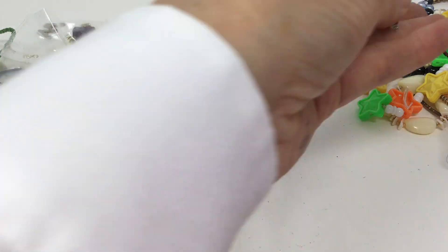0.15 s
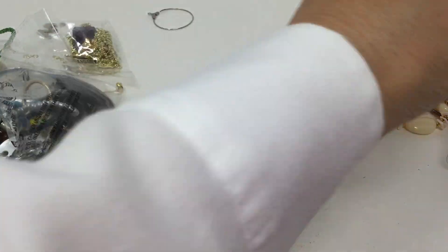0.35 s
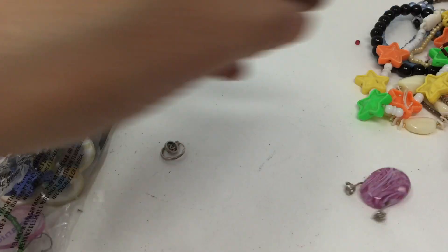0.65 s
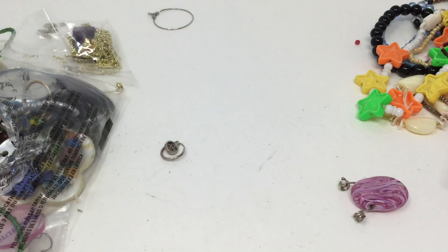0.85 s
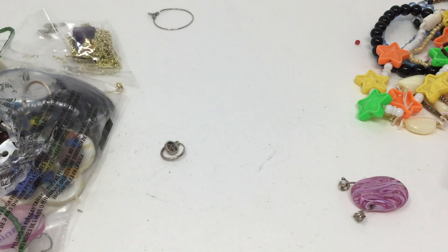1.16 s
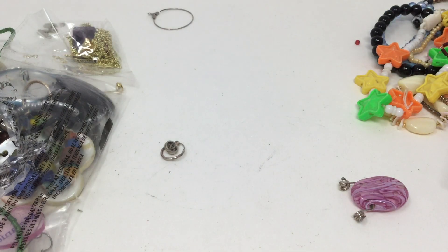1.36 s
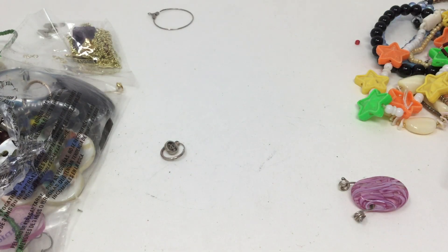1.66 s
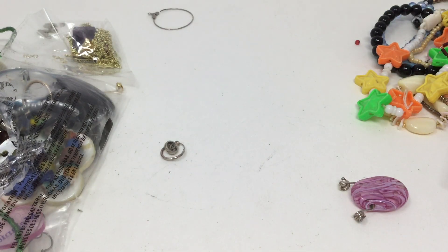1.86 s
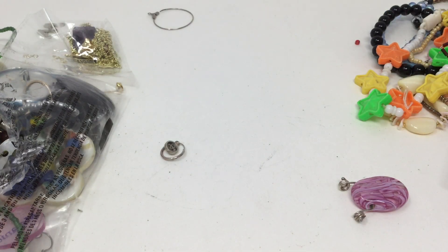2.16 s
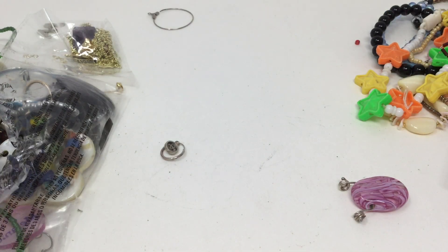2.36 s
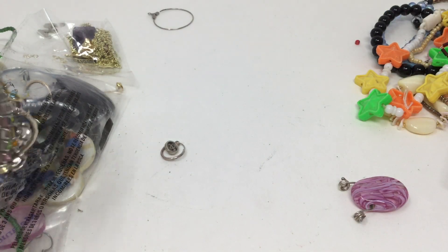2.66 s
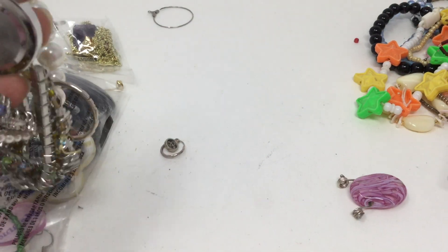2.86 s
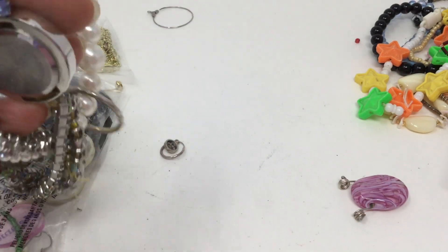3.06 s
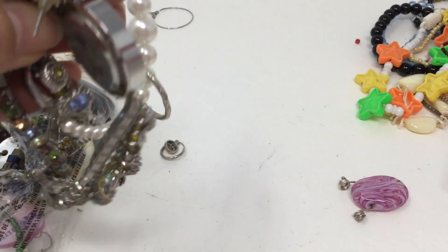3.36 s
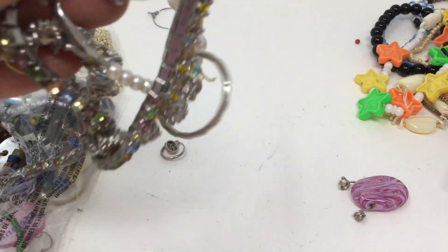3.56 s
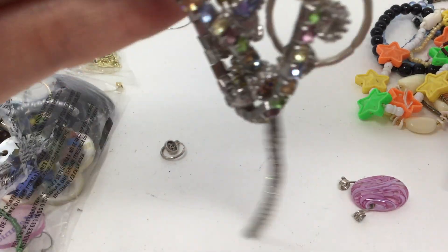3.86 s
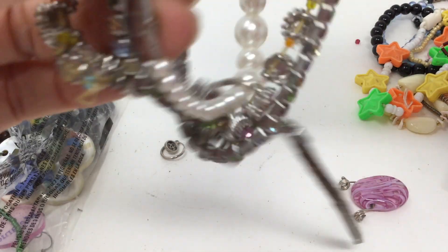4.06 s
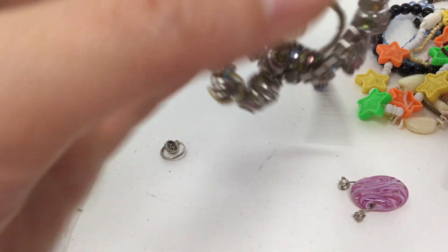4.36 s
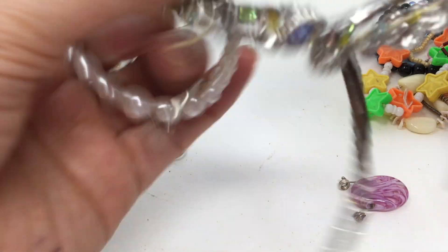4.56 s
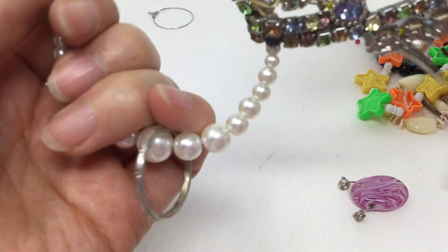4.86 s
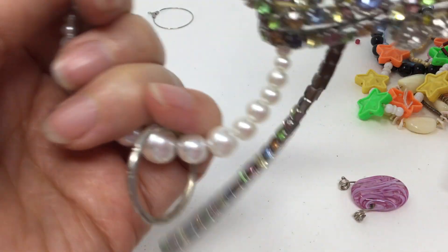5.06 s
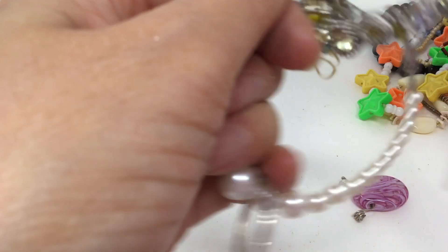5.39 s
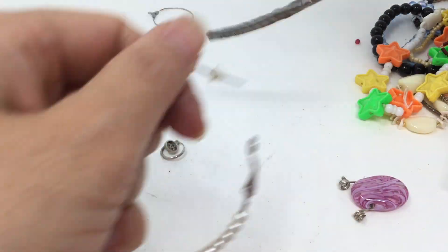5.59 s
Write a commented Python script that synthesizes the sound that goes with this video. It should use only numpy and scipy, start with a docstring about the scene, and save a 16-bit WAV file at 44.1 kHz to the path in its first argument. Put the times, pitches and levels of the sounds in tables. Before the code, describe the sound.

A hard piece of jewellery clatters loudly onto a tabletop, then chains and beads rustle, clack and jingle lightly over a low unsteady hum.

```python
"""At a tabletop in a small room with a low, unsteady hum, costume jewellery is sorted, heard by one microphone.
A hard piece clatters down and rings through resonances; dull bumps stir the low modes of the tabletop.
A hand rummages in a heap of chains and beads, then a tangle is lifted and pulled apart, jingling:
showers of damped sines make jingle and scrape, while clacks, snaps and knocks are struck one by one.
The room answers with a tail of noise in which each frequency dies at its own speed."""
import sys
import numpy as np
from scipy import signal
from scipy.fft import rfft, irfft, next_fast_len
from scipy.io import wavfile
from scipy.ndimage import uniform_filter1d, map_coordinates

SR = 44100
rng = np.random.default_rng(int(sys.argv[2]) if len(sys.argv) > 2 else 0)


def persist_wave(psi):
    """Save psi, clipped to +-1, as 16-bit WAV."""
    counts = np.round(np.clip(psi, -1, 1) * 32767).astype(np.int16)
    wavfile.write(sys.argv[1], SR, np.atleast_2d(counts).T)


N = 252648

# Levels in the tables are relative: each source sets its own gain later.
# tones of the hum before its swell: [f/Hz, level/dB rms]
HUM_TONES = [(96.9, -76), (129.2, -76), (150.7, -72)]
# slow swell of the hum: [t/s, gain/dB]
HUM_SWELL = [(4.2, 5), (5, -3.5)]
# spectrum of the quiet air: [f/Hz, level/dB]
AIR_SPECTRUM = [(25, -27.5), (110, -15.5), (200, -19.5), (550, -36.5), (5000, -46.5), (15000, -55)]
# decay of the room: [f/Hz, time to fall 60 dB/s]
ROOM_DECAY = [(100, 0.89), (500, 0.6), (1400, 1), (4200, 0.4)]
# what the walls reflect: [f/Hz, level/dB]
WALL_REFLECTION = [(100, -6.5), (2100, -1.5), (3200, -1), (12000, -7.5)]
# treble response of the microphone: [f/Hz, gain/dB]
MIC_RESPONSE = [(12500, -1.5), (14000, -12), (15400, -24.5)]
# low modes of the tabletop: [f/Hz, width/Hz, level/dB]
TABLE_MODES = [(69.5, 36, -12), (135.7, 38.8, 1.5), (168, 44.6, -1.5), (308, 33, -11.5)]
# dull bumps on the table: [t/s, knock level/dB, thump level/dB]
BUMPS = [(0.612, -50, -33.5), (0.689, -15, -37), (2.796, -58, -36), (2.811, -58.5, -37),
         (2.856, -46.5, -45.5), (2.907, -29, -38), (2.9156, -17, -32), (2.923, -25.5, -26),
         (2.964, -28, -34.5), (3.0, -34, -49), (3.598, -59, -63), (3.633, -54, -58.5), (4.003, -37, -60),
         (5.267, -52.5, -60.5)]
# spectrum of a padded knock: [f/Hz, level/dB]
KNOCK_SPECTRUM = [(50, -25), (200, -8.5), (440, 3), (600, -2), (900, 2), (1600, -2.5), (2400, -15),
                  (3500, -32.5), (12000, -66)]
# spectrum of the boom under a bump: [f/Hz, level/dB]
BOOM_SPECTRUM = [(350, 0.0), (2000, -20.5)]
# the hard piece lands and rocks: [t/s, level/dB]
CLATTER = [(.58, -20.5), (.586, -16), (.598, -11.5), (.607, -11.5), (.614, -27), (.667, -20), (.68, -19.5),
           (.729, -28.5), (.87, -33.5), (.89, -30)]
# resonances of the hard piece: [f/Hz, width/Hz, level/dB]
PIECE_MODES = [(624, 90, -4), (808, 90, 1.5), (1218, 60, 6), (1323, 150, 1), (1630, 74, -11.5),
               (2026, 37, 4), (2250, 140, -8.5), (2553, 80, -5), (4070, 190, -21)]
# spectrum applied to its ringing: [f/Hz, level/dB]
RING_SPECTRUM = [(4200, 3.0), (9000, -9.5)]
# spectrum of its loose parts rattling: [f/Hz, level/dB]
RATTLE_SPECTRUM = [(40, -36.5), (250, -5.0), (2300, -2.5), (3200, -9.5), (5500, -18.0), (13000, -36.5)]
# the heap knocks against its container: [t/s, level/dB]
TAPS = [(1.243, -41), (1.605, -40), (1.665, -34.5), (1.899, -35), (2.025, -39)]
# resonances of the container: [f/Hz, width/Hz, level/dB]
CONTAINER_MODES = [(805, 52, 2), (1290, 120, -15), (2210, 260, -14.5)]
# a free ring sings briefly: [t/s, level/dB, f/Hz]
RINGS = [(2.117, -48, 6170), (3.703, -64.5, 6920)]
# beads and pendants clack together: [t/s, level/dB, f/Hz]
BEADS = [(0.069, -57, 1470), (0.775, -36.5, 4180), (1.095, -40.5, 2370), (1.485, -29.5, 3860),
         (1.517, -27.5, 2460), (1.572, -35, 2350), (1.61, -39, 2350), (1.951, -36, 2450),
         (1.971, -30, 4250), (2.01, -27, 4080), (2.023, -26.5, 4230), (2.046, -29.5, 3260),
         (2.341, -40, 1368), (2.963, -39, 1310), (3.281, -45, 2200), (3.566, -39, 1240), (3.887, -48, 1050),
         (3.923, -43, 1740), (4.002, -37, 4440), (4.01, -35, 4750), (4.166, -48, 1660), (4.264, -47, 2520),
         (4.652, -41.5, 1244), (5.415, -50.5, 1760)]
# metal links and rings snap together: [t/s, level/dB, f/Hz]
LINKS = [(1.204, -46, 4480), (1.518, -31.5, 8300), (1.765, -38.5, 9450), (2.114, -40, 6330),
         (2.173, -44, 6550), (2.204, -39, 5430), (2.281, -45.5, 7200), (2.998, -52, 7010),
         (3.269, -51, 6660), (3.556, -36.5, 7080), (3.576, -41.5, 7640), (4.158, -42.5, 5820),
         (4.239, -44.5, 4230), (4.523, -42.5, 8080), (4.571, -41, 7760), (4.65, -36.5, 6200),
         (4.715, -20, 5440), (4.7466, -34, 8930), (4.7634, -35.5, 4200), (4.827, -46.5, 5700),
         (5.307, -50, 7130), (5.659, -50, 5840), (5.721, -46, 5500)]
# pushes over the table or through the fingers: [t/s, hold/s, settling/s, scrape level/dB, jingle level/dB]
DRAGS = [(0.696, 0.011, 0.11, -38.5, -57.5), (0.846, 0.088, 0.033, -64, -74.5),
         (1.156, 0.012, 0.032, -50.5, -64.5), (1.219, 0.012, 0.2, -52, -67.5),
         (1.389, 0.37, 0.15, -58, -65.5), (1.514, 0.24, 0.25, -50, -59.5), (1.974, 0.062, 0.2, -47, -51.5),
         (2.076, 0.073, 0.095, -62, -63.5), (2.292, 0.015, 0.35, -65.5, -70),
         (2.586, 0.045, 0.17, -63.5, -73.5), (2.81, 0.17, 0.35, -63, -77), (3.244, 0.064, 0.17, -65, -74),
         (3.538, 0.068, 0.13, -60.5, -66), (3.762, 0.17, 0.046, -63.5, -73),
         (4.138, 0.23, 0.059, -71.5, -80)]
# the lifted tangle is shaken in the air: [t/s, hold/s, jingle level/dB]
SHAKES = [(4.045, 0.0079, -68.5), (4.188, 0.13, -63), (4.627, 0.068, -55.5), (5.506, 0.021, -70.5),
          (5.618, 0.055, -67)]
# the jolted tabletop trembles on: [t/s, level/dB]
TREMORS = [(.8, -47), (1.22, -54), (1.62, -52), (1.991, -49.5), (2.98, -38.5)]
# spectrum of jingling chains: [f/Hz, level/dB]
CHAIN_SPECTRUM = [(500, -27), (1500, -1.5), (2500, 3), (4000, 1), (7000, 0), (12500, -5.5)]
# spectrum of scraping pieces: [f/Hz, level/dB]
DRAG_SPECTRUM = [(60, -26), (240, -1), (350, 5), (800, -0.5), (1700, -4.5), (2700, -18.5), (9000, -42.5)]
# resonances of beads rolling in the heap: [f/Hz, width/Hz, level/dB]
HEAP_MODES = [(1970, 170, 4.5), (2461, 110, 8), (4960, 4200, -4)]

TOP_HZ = 15400  # band limit
REBOUNDS_PER_S, REBOUND_DB = 500, 1  # how fast and how unevenly a contact chatters
DAMPING_DB_PER_S = 43.5  # the hard piece rings less as it settles
THUMP_DB = -28  # push of each of its contacts on the tabletop, relative to the contact
RATTLE_S, RATTLE_GROWS = 0.017, 1  # bead rattle time at 1 kHz; it grows by this power of pitch
DRAG_RISE_S = 0.067  # time for a push to swell by 20 dB
SHAKE_RISE_S, SHAKE_SETTLE_S = 0.14, 0.055  # times to swell and to die by 20 dB
TREMOR_RISE_S, TREMOR_SETTLE_S = 0.2, 0.2  # times to swell and to die by 20 dB
RUB_DB = -13.5  # drag of a shaken tangle in the fingers, relative to its jingle
FIRM_DB = -53  # drag level of a firm scrape
RUMBLE_DB, RUMBLE_GROWS = -55, 0.77  # rumble under a firm scrape; dB more for each dB of drag
SPARSE_DB = -72  # well below this jingle level the links are heard one by one


def amp(db):
    """Decibels to amplitude."""
    return 10 ** (np.asarray(db) / 20)


def unit(x):
    """Scale to rms 1."""
    return x / np.sqrt(np.mean(x ** 2) + 1e-20)


def along(points, hz):
    """Read (Hz, value) points on a log frequency axis."""
    f, values = np.transpose(points)
    return np.interp(np.log(hz + 1), np.log(f + 1), values)


def add(track, s, sound):
    """Mix a sound in at time s."""
    part = track[max(round(s * SR), 0):][:len(sound)]
    part += sound[:len(part)]


def wobble(rate):
    """A smooth random curve, rate knots a second."""
    knots = rng.standard_normal(int(N * rate / SR) + 4)
    return map_coordinates(knots, [np.arange(N) * rate / SR])


def coloured(x, db_of_hz):
    """Causal (minimum-phase) filter with the given dB curve."""
    m = 2 * next_fast_len(len(x) // 2 + 2048)
    gain = amp(db_of_hz(np.fft.rfftfreq(m, 1 / SR)))
    # folding the cepstrum onto positive time gives the minimum phase
    cepstrum = irfft(np.log(gain + 1e-6), m)
    cepstrum[1:m // 2] *= 2
    cepstrum[m // 2 + 1:] = 0
    return irfft(rfft(x, m) * np.exp(rfft(cepstrum)), m)[:len(x)]


def shaped(x, spectrum):
    """Colour a sound by a table of (Hz, dB) points."""
    return coloured(x, lambda hz: along(spectrum, hz))


def resonate(x, modes):
    """Pass x through a body's resonances, alternating in sign."""
    m = next_fast_len(len(x) + SR // 4)
    f = np.fft.rfftfreq(m, 1 / SR)
    body = 0
    for k, (hz, width, db) in enumerate(modes):
        peak = 1j * f * width / (hz * hz - f * f + 1j * f * width)
        body = body + (-1) ** k * amp(db) * peak
    return irfft(rfft(x, m) * body, m)[:len(x)]


def struck(force, modes, detune, vary_db):
    """A body hit at a new spot: each mode is a little shifted, and stronger or weaker."""
    varied = []
    for hz, width, db in modes:
        varied.append((hz * np.exp(detune * rng.normal()), width, db + vary_db * rng.normal()))
    return resonate(force, varied)


def contact(chatter, t60, size=6000):
    """A sharp touch and the dying chatter of tiny rebounds that follows it; energy 1."""
    t = np.arange(size) / SR
    unevenness = np.interp(t * REBOUNDS_PER_S, np.arange(size), rng.standard_normal(size))
    rebounds = amp(REBOUND_DB * unevenness) * rng.standard_normal(size)
    tail = rebounds * amp(-60 * t / max(t60, .002)) * (1 - np.exp(-t / 0.002))
    force = chatter * tail / np.linalg.norm(tail)
    force[0] = 1
    return force / np.linalg.norm(force)


def click(force, centre_hz, below_db, above_db):
    """A small object's answer, falling by so many dB an octave on either side of its pitch; energy 1."""
    def slope(hz):
        octaves = np.log2((hz + 1) / centre_hz)
        return np.maximum(np.minimum(below_db * octaves, -above_db * octaves), -50)
    sound = coloured(force, slope)
    return sound / np.linalg.norm(sound)


def clink(force, hz, q, scatter, others_db, count=4):
    """A small piece rings at its pitch, and its neighbours more weakly around it; energy 1."""
    neighbours = hz * np.exp(scatter * rng.standard_normal(count))
    others = [(f, f / q, others_db) for f in neighbours]
    ring = resonate(force, [(hz, hz / q, 0)] + others)
    return ring / np.linalg.norm(ring)


def grains(rate, low_hz, high_hz, cycles, spread_db, size=300):
    """Many tiny collisions, each a damped sine of its own pitch and strength; rms 1."""
    draw = rng.random((int(rate * N / SR), 3))
    hz = low_hz * (high_hz / low_hz) ** draw[:, 1:2]
    turns = hz * np.arange(size) / SR
    strength = amp(-spread_db * np.log(np.maximum(draw[:, 2:], .01))) * hz
    waves = strength * np.sin(2 * np.pi * turns) * np.exp(-turns / cycles)
    where = (draw[:, :1] * N).astype(int) + np.arange(size)
    return unit(np.bincount(where.ravel(), waves.ravel(), N)[:N])


def clumped(x, depth_db):
    """Pieces of different size move in turn, so the colour shifts every few hundredths of a second; rms 1."""
    z = signal.stft(x, nperseg=256)[2]
    across_pitch = uniform_filter1d(rng.standard_normal(z.shape), size=7, axis=0)
    field = uniform_filter1d(across_pitch, size=6, axis=1)
    return unit(signal.istft(z * amp(depth_db * unit(field)), nperseg=256)[1][:N])


def stroke(s, hold_s, rise_s, settle_s):
    """Gain of one movement: it swells until s, holds, and settles; 20 dB per rise or settling time."""
    t = np.arange(N) / SR - s
    return amp(-20 * (np.maximum(-t, 0) / rise_s + np.maximum(t - hold_s, 0) / settle_s))


def hum():
    """A machine hums in the quiet air: tones waver in level and phase over shaped noise."""
    t = np.arange(N) / SR
    tones = np.zeros(N)
    for hz, db in HUM_TONES:
        level = amp(db + 0.4 * wobble(0.88)) * np.sqrt(2)
        tones += level * np.sin(2 * np.pi * hz * t + 0.9 * wobble(17.0))
    swell = amp(np.interp(t, *np.transpose(HUM_SWELL)))
    air = unit(shaped(rng.standard_normal(N), AIR_SPECTRUM))
    return swell * tones + amp(-72.5) * air


def room(x):
    """Each frequency of the room's answer, a noise tail, dies at its own speed."""
    hz, t, z = signal.stft(rng.standard_normal(SR), SR, nperseg=256)
    decay = amp(-60 * t / along(ROOM_DECAY, hz)[:, None])
    tail = signal.istft(z * decay, SR, nperseg=256)[1]
    tail = shaped(tail / np.linalg.norm(tail), WALL_REFLECTION)
    delayed = np.pad(tail, (SR // 150, 0))  # the answer starts 1/150 s late
    return signal.fftconvolve(x, delayed)[:N]


def bumps():
    """Padded blows: a dull knock, and the tabletop booms in its low modes."""
    knocks, pushes = np.zeros((2, N))
    for s, knock_db, thump_db in BUMPS:
        add(knocks, s, amp(knock_db) * contact(chatter=1.0, t60=0.074))
        add(pushes, s, amp(thump_db) * contact(chatter=0.58, t60=0.18))
    boom = shaped(resonate(pushes, TABLE_MODES), BOOM_SPECTRUM)
    return amp(24.5) * shaped(knocks, KNOCK_SPECTRUM) + amp(54.5) * boom


def clatter():
    """Each contact rings the piece, rattles its loose parts, and pushes the tabletop; lying flat damps the ring."""
    blows, rattles, pushes = np.zeros((3, N))
    for s, db in CLATTER:
        damping_db = min(DAMPING_DB_PER_S * (s - CLATTER[0][0]), 10)
        blow = struck(contact(chatter=0.98, t60=0.052), PIECE_MODES, detune=0.014, vary_db=2)
        add(blows, s, amp(db - damping_db) * blow)
        add(rattles, s - .002, amp(db) * contact(chatter=15.0, t60=0.08))
        add(pushes, s, amp(db + THUMP_DB) * contact(chatter=0.074, t60=.05))
    # the rattling parts set the piece ringing too
    ring = shaped(blows + .5 * resonate(rattles, PIECE_MODES), RING_SPECTRUM)
    rattle = shaped(rattles, RATTLE_SPECTRUM)
    return amp(28.5) * ring + amp(20) * rattle + amp(41.5) * resonate(pushes, TABLE_MODES)


def taps():
    """Pieces in the heap knock against their container, which answers with a hollow note."""
    out = np.zeros(N)
    for s, db in TAPS:
        knock = struck(contact(chatter=1.3, t60=.035), CONTAINER_MODES, detune=.02, vary_db=2)
        add(out, s, amp(db + 17.5) * knock / np.linalg.norm(knock))
    return out


def rings():
    """A ring that hangs free keeps one thin tone, falling 60 dB in 0.11 s."""
    out, t = np.zeros(N), np.arange(SR // 4) / SR
    for s, db, hz in RINGS:
        add(out, s, amp(db - 60 * t / 0.11) * np.sin(2 * np.pi * hz * t))
    return out


def beads():
    """Strung beads clack in short rattles; each clack rings a cluster of damped modes around its pitch."""
    out = np.zeros(N)
    for s, db, hz in BEADS:
        rattle_s = RATTLE_S * (hz / 1000) ** RATTLE_GROWS
        force = contact(chatter=1.7, t60=rattle_s)
        ring = clink(force, hz, q=hz / 110, scatter=.3, others_db=-2, count=7)
        add(out, s, amp(db + 10) * (click(force, hz, below_db=8.5, above_db=20) + 0.64 * ring))
    return out


def links():
    """Metal on metal: a hard tick with a short bright chatter and a thin ring."""
    out = np.zeros(N)
    for s, db, hz in LINKS:
        force = contact(chatter=1.1, t60=.035)
        ring = clink(force, hz, q=36, scatter=.3, others_db=-4, count=6)
        tick = click(force, hz, below_db=9.5, above_db=5.5)
        add(out, s + 0.0014, amp(db + 9.5) * (tick + 0.38 * ring))
    return out


def movements():
    """How strongly the chains jingle, the pieces scrape and the tabletop rumbles; powers add up."""
    jingle, drag, rumble = np.zeros((3, N))
    for s, hold_s, settle_s, scrape_db, jingle_db in DRAGS:
        push = stroke(s, hold_s, DRAG_RISE_S, settle_s)
        jingle = np.hypot(jingle, amp(jingle_db) * push)
        drag = np.hypot(drag, amp(scrape_db) * push)
    for s, hold_s, db in SHAKES:
        shake = amp(db) * stroke(s, hold_s, SHAKE_RISE_S, SHAKE_SETTLE_S)
        jingle = np.hypot(jingle, shake)
        drag = np.hypot(drag, amp(RUB_DB) * shake)
    for s, db in TREMORS:
        rumble = np.hypot(rumble, amp(db) * stroke(s, 0, TREMOR_RISE_S, TREMOR_SETTLE_S))
    scrape_rumble = amp(RUMBLE_DB) * (drag / amp(FIRM_DB)) ** RUMBLE_GROWS
    return jingle, drag, np.hypot(rumble, scrape_rumble)


def chains(jingle):
    """Moving links shower tiny clicks, each setting its neighbours chattering; the finest merge into a hiss."""
    ticks = grains(rate=1300, low_hz=2380, high_hz=15400, cycles=2, spread_db=5)
    tinkles = grains(rate=1200, low_hz=2325, high_hz=12840, cycles=50, spread_db=4.3, size=700)
    singles = grains(rate=200, low_hz=2400, high_hz=13000, cycles=2, spread_db=3.5)
    # a light touch drops single links, a firm one a whole shower
    crowd = jingle / (jingle + amp(SPARSE_DB))
    falling = np.sqrt(crowd) * (ticks + .6 * tinkles) + np.sqrt(1 - crowd) * singles
    clicks = signal.fftconvolve(falling, contact(chatter=0.7, t60=.02))[:N]
    hiss = 0.47 * rng.standard_normal(N)
    chain = clumped(shaped(clicks + hiss, CHAIN_SPECTRUM), depth_db=1.5)
    showers = unit(amp(2.3 * wobble(130)))
    return jingle * chain * showers


def scraping(drag):
    """Dragged pieces catch and slip: dull grains and noise, unsteady in level."""
    scrape = grains(rate=1600, low_hz=250, high_hz=5000, cycles=6, spread_db=4, size=1100)
    scrape = shaped(scrape + .3 * rng.standard_normal(N), DRAG_SPECTRUM)
    return drag * unit(scrape * amp(2 * wobble(70)))


def rolling_beads(jingle, drag):
    """Beads roll in the heap only where pieces both jingle and drag; the heap resonates."""
    pebbly = grains(rate=1500, low_hz=1900, high_hz=5200, cycles=16, spread_db=3.8, size=900)
    return np.sqrt(jingle * drag) * unit(resonate(pebbly, HEAP_MODES))


def handling():
    """The hand's movements drive chains, scraping and rolling beads, and stir the table's low modes."""
    jingle, drag, rumble = movements()
    boom = unit(resonate(rng.standard_normal(N), TABLE_MODES))
    pieces = chains(jingle) + amp(-1) * scraping(drag) + amp(-4.5) * rolling_beads(jingle, drag)
    return pieces + rumble * boom


def scene():
    """The jewellery direct, the room's answer to it, and the hum."""
    direct = bumps() + clatter() + taps() + rings() + beads() + links() + handling()
    return (direct + amp(-14.5) * room(direct) + hum())[None]


def record(dry):
    """The microphone dulls the highest treble; nothing passes the band limit."""
    x = shaped(dry[0], MIC_RESPONSE)
    m = next_fast_len(N + SR // 4)
    passed = np.fft.rfftfreq(m, 1 / SR) < TOP_HZ
    return irfft(rfft(x, m) * passed, m)[None, :N]


dry = scene()
out = record(dry)
persist_wave(out)
```